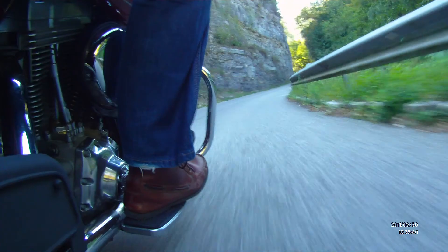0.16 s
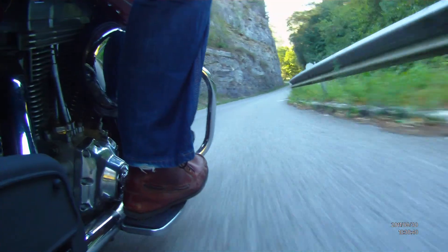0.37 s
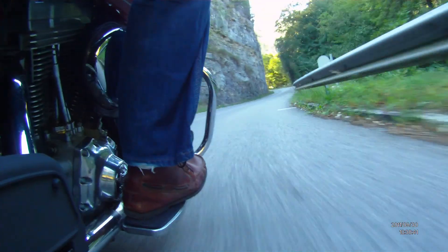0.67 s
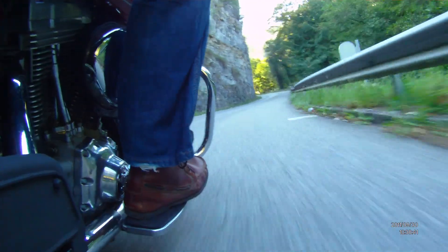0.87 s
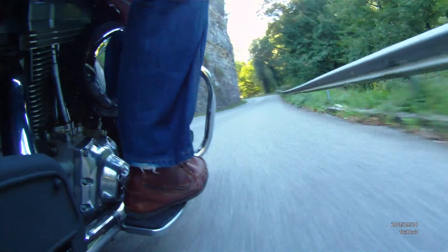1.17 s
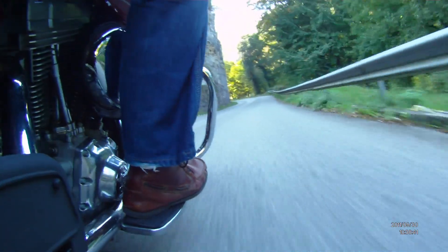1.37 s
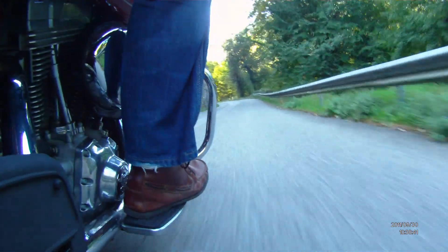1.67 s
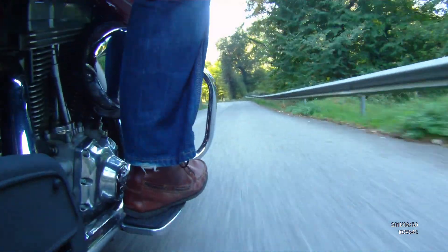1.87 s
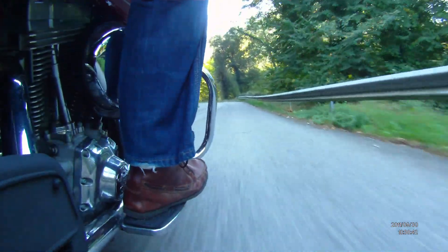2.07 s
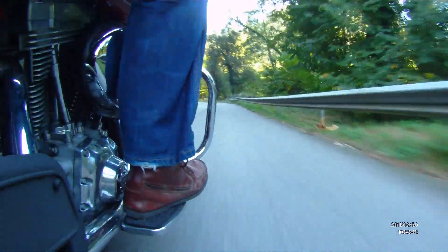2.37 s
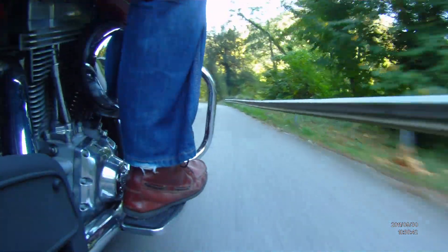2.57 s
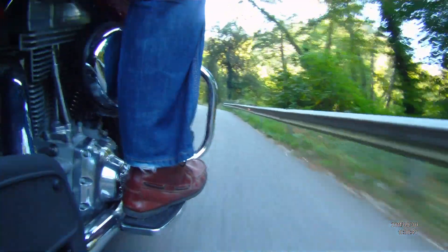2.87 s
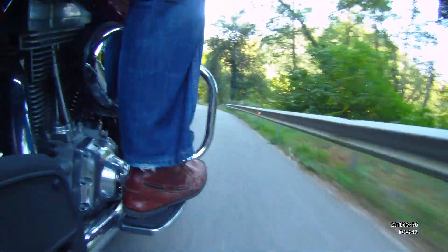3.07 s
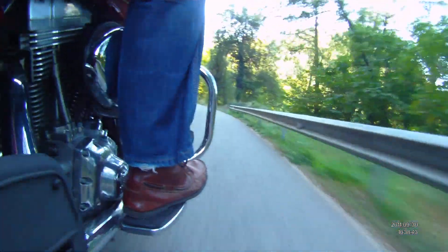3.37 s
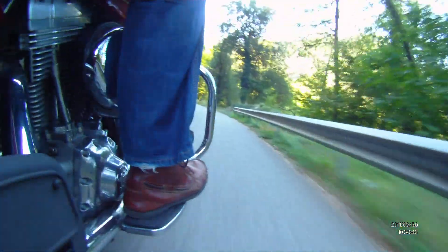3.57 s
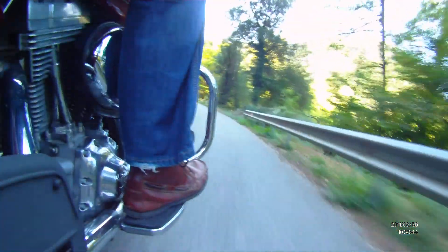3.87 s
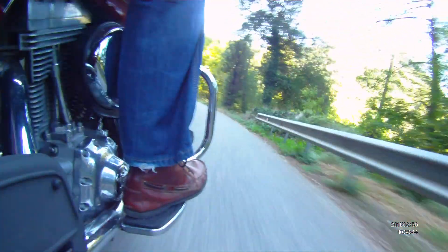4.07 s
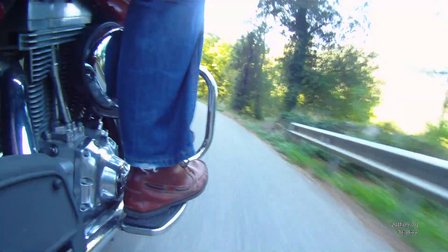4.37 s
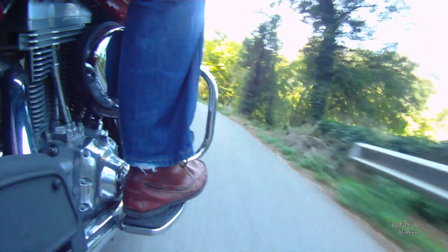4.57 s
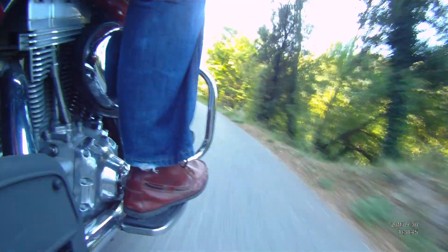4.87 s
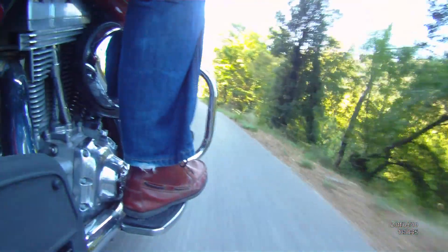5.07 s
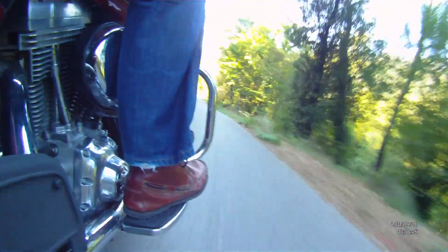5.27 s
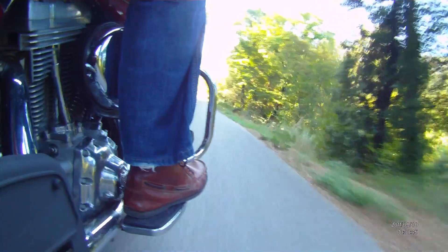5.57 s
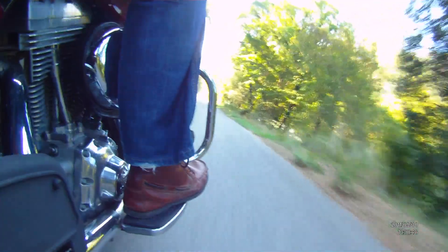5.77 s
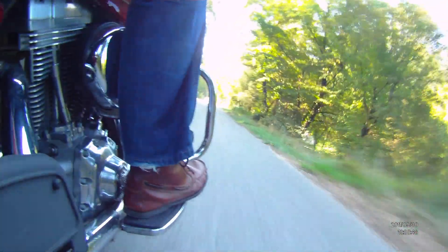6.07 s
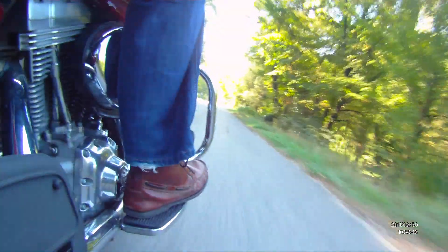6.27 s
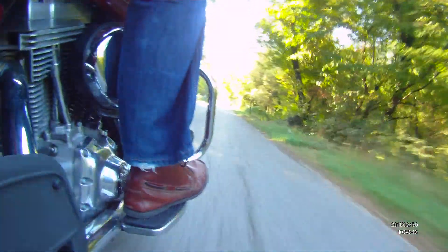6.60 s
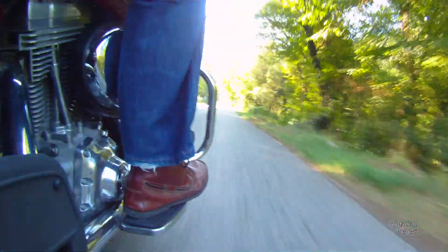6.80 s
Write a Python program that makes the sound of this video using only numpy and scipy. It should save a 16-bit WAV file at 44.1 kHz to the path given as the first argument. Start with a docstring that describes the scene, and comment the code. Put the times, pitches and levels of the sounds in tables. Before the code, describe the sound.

A big air-cooled twin motorcycle heard close at the engine revs up, clunks through a gear change, pulls hard and settles into a rattling, whining cruise.

```python
"""Big air-cooled V-twin motorcycle beside the crankcase: gritty rasp bursts locked to the two-turn cycle.
It pulls, shifts up with a clunk and pulls again into a cruise on a country road.
Contacts ring case and cover modes as drive clatter; valves tick; gears whine, sing and whistle as crank orders.
The exhaust drones as whole and half crank orders behind, over wind and tyre rumble of shaped noise.
Crank speed, throttle and the gear engaged drive the part levels."""
import sys
import numpy as np
from scipy import signal
from scipy.fft import rfft, irfft, next_fast_len
from scipy.io import wavfile

SR = 44100
rng = np.random.default_rng(int(sys.argv[2]) if len(sys.argv) > 2 else 0)


def master(y):
    """Save y as 16-bit WAV."""
    cut = np.clip(np.atleast_2d(y).T, -1, 1)
    pcm = np.round(cut * 32767)  # scale
    wavfile.write(sys.argv[1], SR, pcm.astype(np.int16))


N = 306054

# engine speed: climbs in the lower gear, falls through the shift, climbs to a cruise: time_s, turns_per_s
CRANK_SPEED = [(0, 34.52), (.3, 34.18), (.6, 35.52), (1.2, 36.78), (1.45, 37.73), (2.0, 26.92),
               (2.25, 25.39), (2.55, 29.62), (2.8, 29.35), (3.1, 30.19), (3.7, 31.14), (4.0, 31.4),
               (4.7, 32.08), (5.1, 32.15), (5.5, 32.34), (6.5, 31.85), (6.94, 32.31)]
# rider pulls, shuts off to shift, blips, pulls hard, eases off: time_s, opening_0_to_1
THROTTLE_OPENING = [(0, 0), (.18, 0.04), (.34, 0.24), (1.0, 0.25), (1.44, 0.14), (1.53, 0), (1.9, 0.02),
                    (2.2, 0), (2.33, 0.12), (2.525, 0), (2.56, 0.47), (2.66, 0.59), (2.78, 0.84),
                    (2.97, 0.88), (3.3, 0.61), (4.3, 0.33), (5.0, 0.31), (5.75, 0.13), (6.6, 0.26),
                    (6.94, 0.03)]
# bursts in each two-turn cycle: start_cycles, rise_cycles, relative_db
RASP_STROKES = [(.042, .1, -2), (.645, .056, 1), (.77, .07, -11), (.2, .07, -13)]
COVER_STROKES = [(.05, .08, -5), (.19, .07, -5), (.68, .05, -7), (.79, .07, -3.5)]
CASE_STROKES = [(.09, .07, -9), (.23, .06, -3), (.67, .06, -7), (.8, .06, -3.5)]
VALVE_STROKES = [(.69, .012, 0), (.12, .012, -6), (.26, .01, -9)]
# noise spectra: frequency_hz, relative_db
RASP_SPECTRUM = [(1500, -22.5), (2400, -4.5), (2880, -5.5), (3060, 0), (3900, -1), (4450, 0.5), (4900, 4),
                 (5500, -2.5), (6200, -9), (7200, -17), (8600, -21.5), (10200, -32.5), (13000, -34.5),
                 (15000, -43.5)]
TICK_SPECTRUM = [(1500, -17), (2700, -2.5), (3200, 1), (4000, 3), (4800, 2), (6000, -14), (8000, -21.5),
                 (14000, -36.5)]
RUMBLE_SPECTRUM = [(20, -25), (35, -21), (50, -22.5), (65, -9.5), (110, -12), (135, -7), (165, -2.5),
                   (215, -5.5), (255, -7.5), (340, -2), (520, -4), (800, -2.5), (1500, 3), (4000, -48.5)]
# resonances of case, covers, struck gears and pipes: frequency_hz, width_hz, relative_db
CASE_MODES = [(630, 57, 2), (703, 74, 0), (766, 60, -2)]
COVER_MODES = [(950, 440, -20.5), (1079, 120, -8.5), (1249, 79, -2.5), (1376, 154, -0.5), (1455, 135, 1),
               (1573, 250, -4.5), (1723, 400, -9.5), (1940, 735, -13), (2230, 254, -10)]
GEAR_MODES = [(1038, 100, -3.5), (1324, 480, 4.5)]
PIPE_MODES = [(218.2, 4.2, 0)]
# share of the rattle alike in every cycle: lower_gear_share, upper_gear_share
REPEAT_SHARES = (.25, .1)
# brief level swings of rattle and whine, mostly dips: time_s, change_db, length_s
LEVEL_SWINGS = [(0.427, 3.5, 0.015), (0.485, 1, 0.02), (0.705, -1, 0.025), (1.03, -4, 0.031),
                (1.548, -2.5, .04), (2.52, 1.5, .035), (2.657, -0.5, 0.021), (2.766, -2, 0.017),
                (2.91, -1, .015), (2.982, -3, 0.015), (3.12, -4, .015), (3.563, -4, 0.035),
                (3.696, -9, 0.012), (3.896, -4, .014), (4.015, -4, 0.029), (4.22, -0.5, .022),
                (4.468, -2, .016), (4.786, -4.5, 0.015), (4.9, -5, 0.013), (5.026, -5, 0.012),
                (5.39, -6, 0.014), (5.633, -7, 0.021), (5.945, -2, .028), (6.092, -1, 0.039),
                (6.223, -7, 0.048), (6.36, -7, 0.034), (6.515, -4, 0.037), (6.594, -4, .03),
                (6.775, -15, 0.013), (6.908, -6, 0.015)]
# singing gears: crank_order, relative_db, drift_rate_hz
GEAR_LINES = [(23.25, -8, 1.5), (69.5, -9, 16), (143, -15, 70), (161.8, -11, 90), (183, -20.5, 60),
              (212, -27, 45)]
# gear-change clunk and louder moments of rattle: time_s, ring_db, crack_db, decay_s
KNOCKS = [(.598, -21.5, -40, 0.015), (.624, -21.5, -42, 0.0073), (.682, -20, -44, .005),
          (1.286, -18.5, -42, 0.0041), (1.34, -21, -41, 0.0072), (1.963, -31, -41, 0.021),
          (1.986, -22, -30.5, 0.0032), (1.99, -23, -39, 0.016), (2.032, -32.5, -42, 0.029),
          (2.039, -30, -54, 0.0049), (2.298, -33, -35, .012), (2.541, -24.5, -42, 0.021),
          (2.819, -21, -41, .007), (2.888, -15.5, -38, 0.0063), (3.159, -22, -36, .0066),
          (3.583, -29.5, -47, 0.02), (4.232, -23, -32, 0.0057), (4.353, -15.5, -46, 0.0047),
          (4.476, -26, -57, .02), (4.798, -22.5, -49, 0.0055), (4.908, -18, -47, .006),
          (4.923, -22, -43, 0.0023), (5.257, -22, -48, 0.0043), (5.813, -25, -48, 0.013),
          (5.967, -32, -46, 0.07), (6.376, -23.5, -50, .013), (6.527, -28, -50, 0.015),
          (6.609, -29, -40, 0.0049), (6.76, -22.5, -43, 0.0056)]
# drone of pipes and engine block: crank_order, lower_gear_relative_db, upper_gear_relative_db
EXHAUST_ORDERS = [(1, -77, -85), (2, -72, -75), (2.5, -67, -76.5), (3, -68.5, -68.5), (3.5, -73, -70.5),
                  (4, -67, -68), (4.5, -59.5, -71.5), (5, -67, -75), (5.5, -56.5, -67.5), (6, -50.5, -57),
                  (6.5, -70, -73), (7, -70, -67.5), (7.5, -60, -70), (8, -60, -74), (9, -58.5, -67.5),
                  (9.5, -60, -64), (10, -55, -63), (10.5, -60.5, -75.5), (11, -59.5, -63), (12, -74, -65),
                  (13, -69, -70), (17, -55.5, -79.5), (18, -49.5, -64.5), (20, -72, -70)]
# pipe and case resonances the drone glides through: frequency_hz, half_width_hz, lift_db
BOOMS = [(95, 2.6, 9), (623.5, 19, 9)]

CONTACTS_PER_CYCLE = 300
PRIMARY_ORDER, GEARBOX_ORDER, WHISTLE_ORDER = 46.5, 45.4, 211  # cycles per crank turn
WHINE_PEAK_HZ, WHINE_WIDTH_HZ = 1451, 32.4  # cover resonance
CLUTCH_BITE_S, CLUTCH_SLIP_S = 2.528, 0.02  # upper gear takes up the drive
CRUISE_TURNS_PER_S, SINGING_TURNS_PER_S = 32, 31.2
KNOCK_ATTACK_S = 0.00035
ROAD_DB, GUST_DB, GUST_RATE_HZ = -43, 1, 15
CUTOFF_HZ = 15150


def from_db(db):
    """Decibels to gain."""
    return 10 ** (np.asarray(db) / 20)


def rms_one(x):
    """Scale to rms 1."""
    return x / np.sqrt(np.mean(x ** 2) + 1e-20)


def in_time(rows):
    """Interpolate a (time, value) curve at every sample."""
    time_s, values = np.transpose(rows)
    return np.interp(np.arange(N) / SR, time_s, values)


def drift(rate_hz):
    """Random drift of rms about 1: noise through two poles at rate_hz."""
    step = 40  # samples per drift point
    pole = np.exp(-2 * np.pi * rate_hz * step / SR)
    noise = rng.standard_normal(N // step + 2002)
    slow = signal.lfilter([1], [1, -2 * pole, pole * pole], noise)[2000:]  # drop filter settling
    return np.interp(np.arange(N) / step, np.arange(len(slow)), rms_one(slow))


def coloured(x, spectrum):
    """Filter x by a spectrum interpolated over log frequency; rms 1."""
    size = next_fast_len(N)
    hz, db = np.transpose(spectrum)
    bins_hz = np.arange(size // 2 + 1) * SR / size
    gain = from_db(np.interp(np.log(bins_hz + 1), np.log(hz), db))
    return rms_one(irfft(rfft(x, size) * gain, size)[:N])


def impacts(per_s, spread_db):
    """Random tiny contacts of uneven size; rms 1."""
    sizes = from_db(spread_db * np.clip(rng.standard_normal(N), -2, 2))
    return rms_one(sizes * (rng.random(N) < per_s / SR))


def body(force, modes, place=0, repeat=0):
    """Randomly signed force rings steep-sided modes; `repeat` is the power share fixed by cycle place."""
    out, power = 0, 0
    for hz, width_hz, db in modes:
        r = np.exp(-np.pi * width_hz / SR)
        numerator = [(1 - r * r) / 2, 0, -(1 - r * r) / 2]
        section = numerator + [1, -2 * r * np.cos(2 * np.pi * hz / SR), r * r]
        usual = rng.standard_normal(CONTACTS_PER_CYCLE)[place]
        fresh = rng.standard_normal(len(force))
        strength = np.sqrt(repeat) * usual + np.sqrt(1 - repeat) * fresh
        ring = signal.sosfilt([section, section], force * strength + 1e-18)
        out = out + from_db(db) * ring
        power += from_db(db) ** 2 * np.pi * width_hz / (2 * SR)
    return out / np.sqrt(power)


def strokes(turns, table, between, uneven_db):
    """Gain of uneven bursts locked to the cycle over a floor `between`; mean power 1 for a fixed floor."""
    power = 0
    for start, rise, db in table:
        cycle = turns / 2 - start + 2
        age = cycle % 1 / rise
        strengths = from_db(db + uneven_db * rng.standard_normal(256))
        power = power + (strengths[cycle.astype(int)] * age * np.exp(1 - age)) ** 2
    return np.sqrt((power / power.mean() + between ** 2) / (1 + between ** 2))


def order_band(turns, order, width_hz):
    """Rough narrow band at a crank order: drifting sine and cosine; rms 1."""
    phase = 2 * np.pi * order * turns
    return rms_one(drift(width_hz) * np.sin(phase) + drift(width_hz) * np.cos(phase))


def effort_db(drive, shut_db, open_db, bend, speed_db, upper_gear_db):
    """Part level from throttle opening, turns per second relative to cruise, and gear."""
    speed, throttle, upper_gear = drive
    load_db = shut_db + open_db * throttle ** bend
    return load_db + speed_db * (speed - CRUISE_TURNS_PER_S) + upper_gear_db * upper_gear


def rasp(turns, throttle, upper_gear, level_db):
    """Cylinder bursts of grit; throttle sharpens them and adds sizzle, the upper gear blurs them."""
    between = (1.45 + .45 * upper_gear) * from_db(-14 * throttle)
    gate = strokes(turns, RASP_STROKES, between, uneven_db=1.15)
    grit = impacts(per_s=20000, spread_db=-0.5) * rng.standard_normal(N)
    highpass = signal.butter(2, 6200, "high", fs=SR, output="sos")
    hiss = signal.sosfilt(highpass, rng.standard_normal(N))
    sizzle_gate = strokes(turns, RASP_STROKES, between=.35, uneven_db=1.5)
    sizzle = from_db(-15 + 20 * throttle) * sizzle_gate * hiss
    return from_db(level_db) * coloured(gate * grit + sizzle, RASP_SPECTRUM)


def clatter(turns, throttle, upper_gear, case_db, cover_db, waver_db=-0.32, waver_rate_hz=7):
    """Chain, tappets and pistons strike case and covers; cover level wavers, slightly less at open throttle."""
    place = (turns / 2 * CONTACTS_PER_CYCLE).astype(int) % CONTACTS_PER_CYCLE
    contacts = rms_one(1.0 * (np.diff(place, prepend=0) != 0))
    repeat = np.interp(upper_gear, [0, 1], REPEAT_SHARES)
    cover_gate = strokes(turns, COVER_STROKES, between=1.0, uneven_db=.7)
    case_gate = strokes(turns, CASE_STROKES, between=.8, uneven_db=.5)
    waver = from_db(waver_db * (4.0 - throttle) * drift(waver_rate_hz))
    cover_ring = body(cover_gate * contacts, COVER_MODES, place, repeat / 2)
    case_ring = body(case_gate * contacts, CASE_MODES, place, repeat)
    return from_db(cover_db) * waver * cover_ring + from_db(case_db) * case_ring


def ticks(turns, level_db):
    """Valves seat at fixed cycle places: short, dry noise ticks of uneven strength."""
    gate = strokes(turns, VALVE_STROKES, between=0, uneven_db=3)
    return from_db(level_db) * coloured(gate * rng.standard_normal(N), TICK_SPECTRUM)


def mesh(turns, order, flutter_db, wander_rad):
    """Tooth-mesh tone, fluttering in level and phase, peaking at the cover resonance."""
    detuning = 2 * (order * np.gradient(turns) * SR - WHINE_PEAK_HZ) / WHINE_WIDTH_HZ
    phase = 2 * np.pi * order * turns + wander_rad * drift(3.5) + 0.053 * drift(57)
    tone = rms_one(from_db(flutter_db * drift(20)) * np.sin(phase))
    return tone / np.sqrt(1 + detuning ** 2)


def whine(turns, level_db, gearbox_db=-4):
    """Primary drive and gearbox mesh at nearly the same pitch and beat."""
    primary = mesh(turns, PRIMARY_ORDER, flutter_db=.9, wander_rad=0.35)
    gearbox = mesh(turns, GEARBOX_ORDER, flutter_db=4.0, wander_rad=0.69)
    return from_db(level_db) * (primary + from_db(gearbox_db) * gearbox)


def level_swings():
    """Gain of brief smooth dips and rises, Gaussian in dB."""
    time_s = np.arange(N) / SR
    total_db = 0
    for center_s, change_db, length_s in LEVEL_SWINGS:
        total_db = total_db + change_db * np.exp(-(2 * (time_s - center_s) / length_s) ** 2)
    return from_db(total_db)


def singing(turns, level_db):
    """Other gears sing in rough bands that follow the crank."""
    out = 0
    for order, db, width_hz in GEAR_LINES:
        out = out + from_db(level_db + db) * order_band(turns, order, width_hz)
    return out


def whistle(turns, level_db, width_hz=35):
    """Thin gear whistle at a high crank order, in patches as the cylinders fire."""
    gate = strokes(turns, RASP_STROKES, between=.8, uneven_db=3)
    return from_db(level_db) * gate * order_band(turns, WHISTLE_ORDER, width_hz)


def knocks(case_db=-15, cover_db=-3, gear_db=-3):
    """Short flurries: gear-change clunk and louder moments of rattle, ringing gears, covers and case."""
    rings, crack = np.zeros(N), np.zeros(N)
    age_s = np.arange(SR // 8) / SR
    for time_s, ring_db, crack_db, decay_s in KNOCKS:
        start = round(time_s * SR)
        at = slice(start, start + len(age_s))
        flurry = (1 - np.exp(-age_s / KNOCK_ATTACK_S)) * np.exp(-age_s / decay_s)
        ring = from_db(gear_db) * body(flurry, GEAR_MODES)
        ring = ring + from_db(cover_db) * body(flurry, COVER_MODES)
        ring = ring + from_db(case_db) * body(flurry, CASE_MODES)
        rings[at] += from_db(ring_db) * ring
        crack[at] += from_db(crack_db) * flurry
    return rings + crack * coloured(rng.standard_normal(N), RASP_SPECTRUM)


def exhaust(turns, level_db, upper_gear):
    """Pipe drone: whole and half orders, since the twin fires unevenly; lines swell through resonances."""
    out, speed = 0, np.gradient(turns) * SR
    for order, lower_db, upper_db in EXHAUST_ORDERS:
        phase = 2 * np.pi * (order * turns + rng.random()) + 0.06 * drift(3.7)
        boom_db = 0
        for hz, half_width_hz, lift_db in BOOMS:
            boom_db = boom_db + lift_db / (1 + ((order * speed - hz) / half_width_hz) ** 2)
        line_db = lower_db + upper_gear * (upper_db - lower_db) + boom_db + 0.27 * drift(3.2)
        out = out + from_db(line_db) * np.sin(phase)
    return np.sqrt(2) * from_db(level_db) * out


def pipe_hum(throttle, shut_db=-61, open_db=-35):
    """Noise rings one pipe resonance, fading as the throttle opens."""
    return from_db(shut_db + open_db * throttle) * body(np.ones(N), PIPE_MODES)


def rumble(engine_db):
    """Engine roar, air tumbling round the leg and tyres on asphalt: one shaped noise, randomly buffeted."""
    level = np.hypot(from_db(ROAD_DB), from_db(engine_db)) * from_db(GUST_DB * drift(GUST_RATE_HZ))
    return level * coloured(rng.standard_normal(N), RUMBLE_SPECTRUM)


def scene():
    """Lock the engine parts to the crank, set levels from speed, throttle and gear, and sum."""
    speed, throttle = in_time(CRANK_SPEED), in_time(THROTTLE_OPENING)
    upper_gear = np.clip((np.arange(N) / SR - CLUTCH_BITE_S) / CLUTCH_SLIP_S, 0, 1)
    turns = np.cumsum(speed) / SR
    drive = (speed, throttle, upper_gear)
    # singing and drone stop growing with speed above these limits
    gear_drive = (np.minimum(speed, SINGING_TURNS_PER_S), throttle, upper_gear)
    pipe_drive = (np.minimum(speed, CRUISE_TURNS_PER_S), throttle, upper_gear)

    # speed_db is dB per turn per second
    rasp_db = effort_db(drive, shut_db=-45.0, open_db=13.5, bend=0.76, speed_db=0.5, upper_gear_db=-3.0)
    case_db = effort_db(drive, shut_db=-44.5, open_db=8.5, bend=1.0, speed_db=0.27, upper_gear_db=0.0)
    cover_db = effort_db(drive, shut_db=-35.0, open_db=8.5, bend=0.69, speed_db=0.35, upper_gear_db=1.5)
    tick_db = effort_db(drive, shut_db=-62, open_db=13, bend=.6, speed_db=1.3, upper_gear_db=-4)
    whine_db = effort_db(drive, shut_db=-43.5, open_db=14.0, bend=0.88, speed_db=-1.3, upper_gear_db=8.0)
    singing_db = effort_db(gear_drive, shut_db=-63.5, open_db=14, bend=0.79, speed_db=7.5, upper_gear_db=22)
    whistle_db = effort_db(drive, shut_db=-73, open_db=20.5, bend=.7, speed_db=-1.5, upper_gear_db=-3.5)
    pipe_db = effort_db(pipe_drive, shut_db=-14, open_db=19.5, bend=0.28, speed_db=3.8, upper_gear_db=1)
    roar_db = effort_db(drive, shut_db=-54.5, open_db=13.5, bend=0.77, speed_db=1.7, upper_gear_db=3.8)

    engine = rasp(turns, throttle, upper_gear, rasp_db) + ticks(turns, tick_db)
    rattle = clatter(turns, throttle, upper_gear, case_db, cover_db)
    chain = level_swings() * (rattle + whine(turns, whine_db))
    gears = singing(turns, singing_db) + upper_gear * whistle(turns, whistle_db) + knocks()
    pipes = exhaust(turns, pipe_db, upper_gear) + pipe_hum(throttle)
    return (engine + chain + gears + pipes + rumble(roar_db))[None]


def record(dry):
    """Microphone drops the deepest rumble; a steep lowpass cuts the top."""
    lean = signal.sosfilt(signal.butter(2, 34, "high", fs=SR, output="sos"), dry)
    return signal.sosfilt(signal.ellip(10, .1, 80, CUTOFF_HZ, fs=SR, output="sos"), lean)


dry = scene()
out = record(dry)
master(out)
```